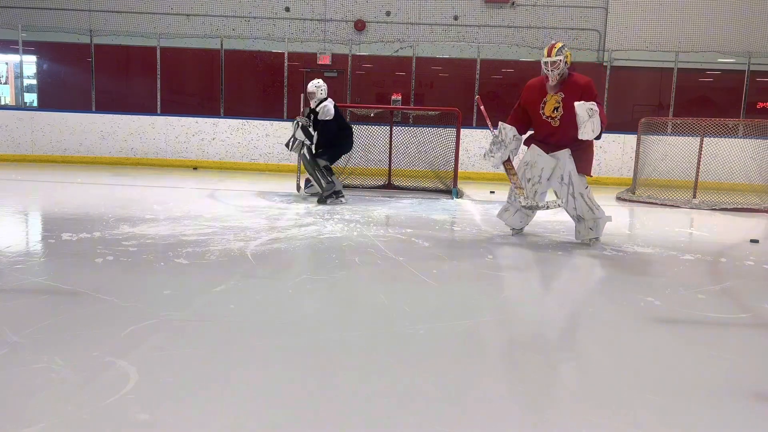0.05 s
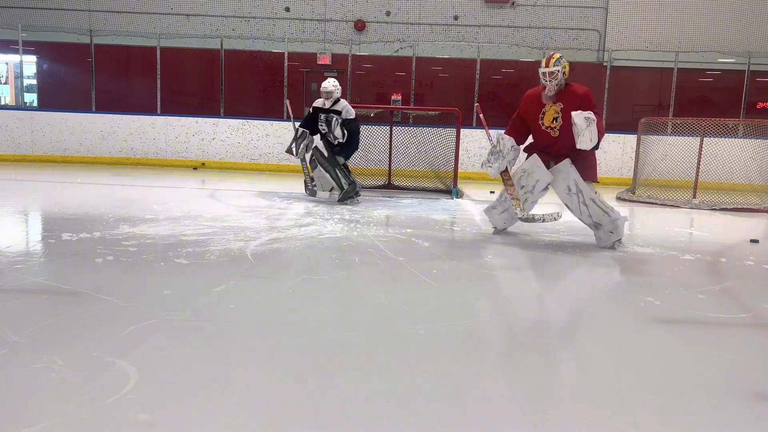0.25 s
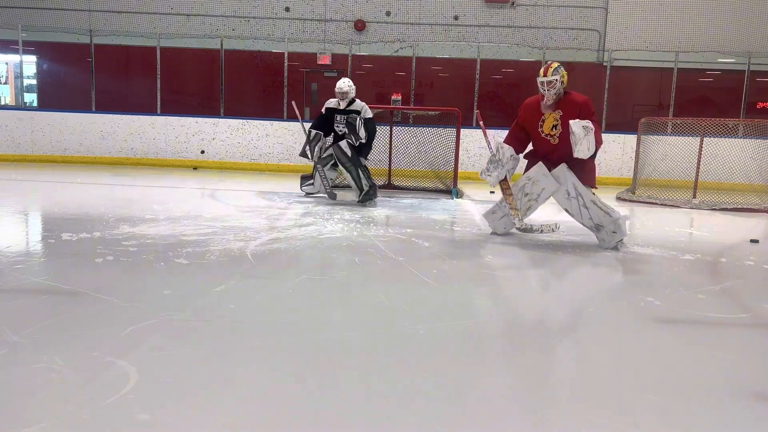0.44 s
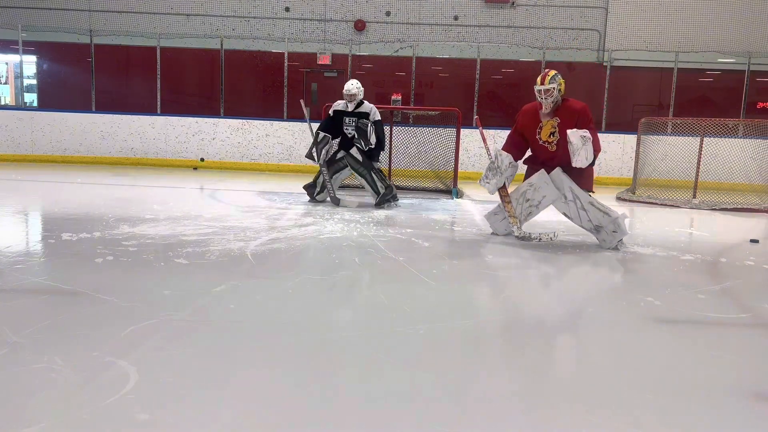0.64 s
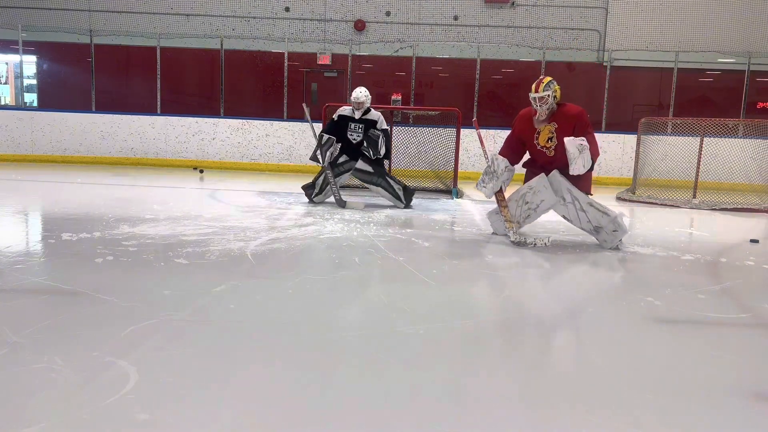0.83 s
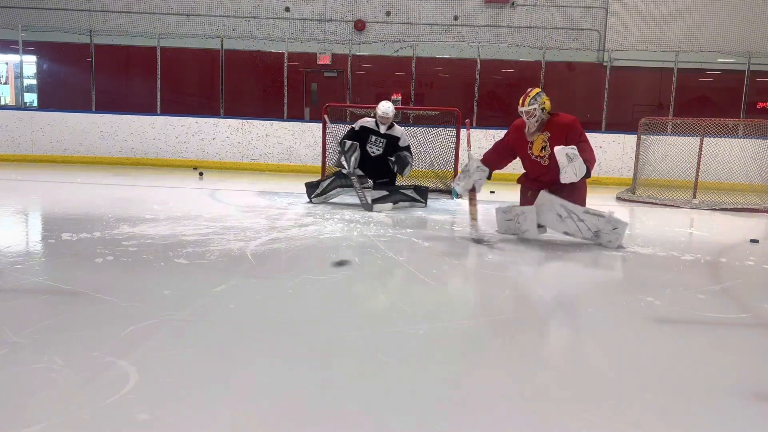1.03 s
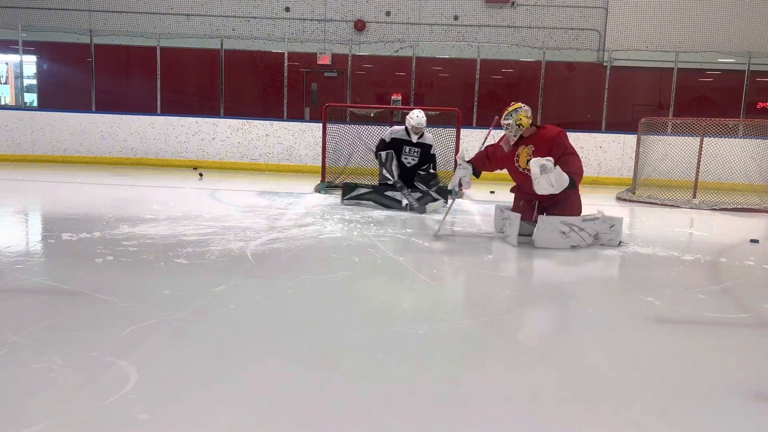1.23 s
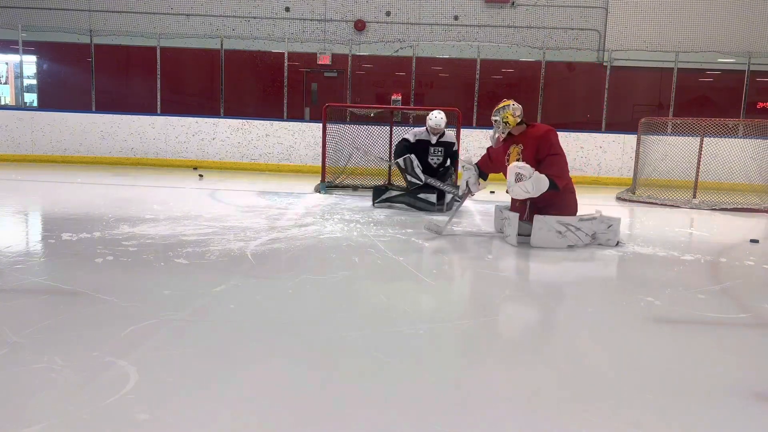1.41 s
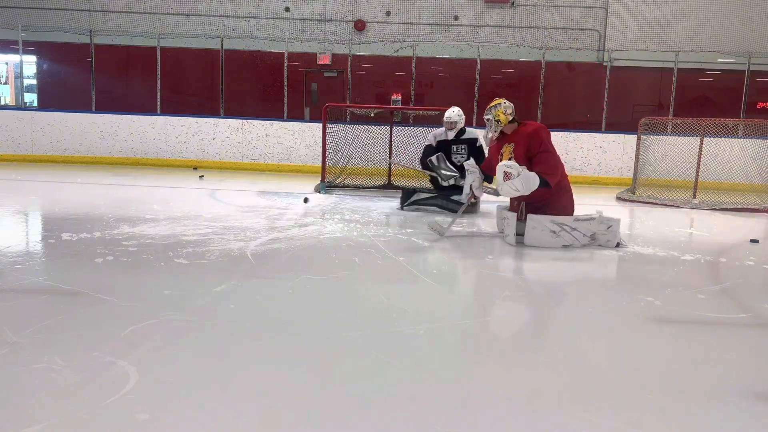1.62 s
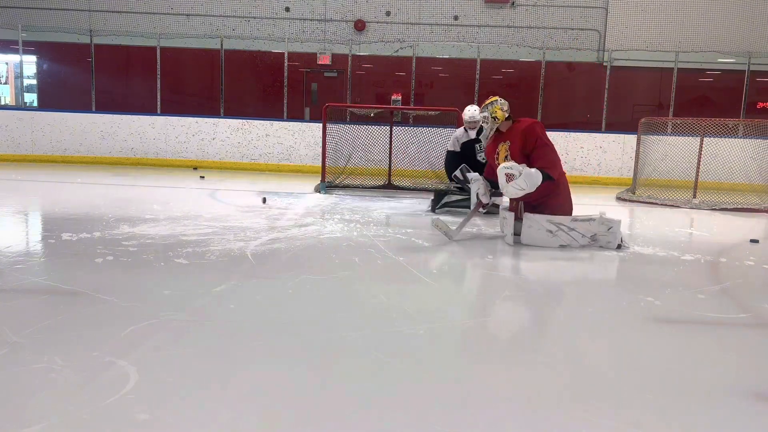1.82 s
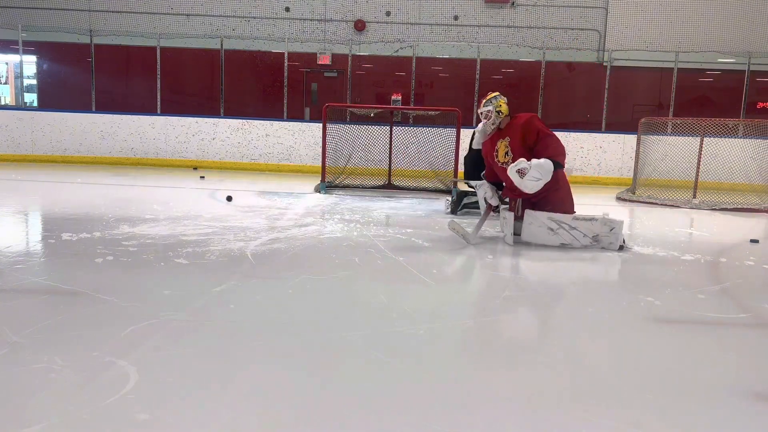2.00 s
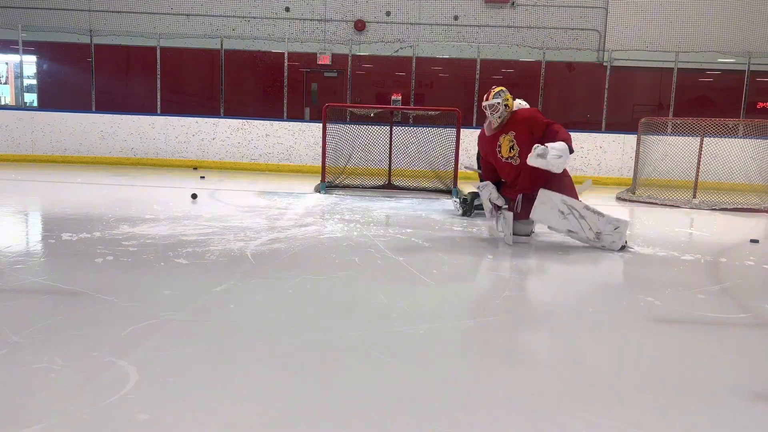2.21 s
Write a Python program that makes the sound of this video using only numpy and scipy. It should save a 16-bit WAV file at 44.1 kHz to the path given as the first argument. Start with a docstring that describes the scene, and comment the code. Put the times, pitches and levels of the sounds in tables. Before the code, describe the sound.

In a rumbling indoor ice rink, a stick taps the ice, then a puck is shot and cracks off a goalie's equipment. Pads drop with a boom and slide, skates scrape and spray snow, and each knock echoes.

```python
"""Goaltender practice in a large indoor ice rink. From the start the hall rumbles under a faint hiss, and steel
skates scrape, spray snow and sing. A stick slaps the ice (0.13 s), then a blade sweeps up a puck and shoots it
(0.7 s). The puck cracks against the goalie's gear (1.15 s) as leg pads drop, boom and slide, and the boards
ring hollow. Last, the loose puck ticks against the boards (2 s). Every knock hangs in a long echo, and a
limiter briefly turns the sound down after the loudest ones."""
import sys
import numpy as np
from scipy import signal
from scipy.fft import rfft, irfft, next_fast_len
from scipy.io import wavfile
from scipy.ndimage import uniform_filter1d, minimum_filter1d

SR = 44100
rng = np.random.default_rng(int(sys.argv[2]) if len(sys.argv) > 2 else 0)


def dump_mix(stems):
    """Bounce the given channels to the path in sys.argv[1] as a 16-bit WAV at rate SR."""
    frames = np.atleast_2d(stems).T  # one column per channel
    limited = np.clip(frames, -1, 1)  # hard clip at full scale
    pcm = np.round(limited * 32767).astype(np.int16)
    wavfile.write(sys.argv[1], SR, pcm)


N = 103635
TIME = np.arange(N) / SR


def from_db(db):
    """Turn decibels into a gain to multiply by."""
    return 10 ** (np.asarray(db) / 20)


def rms_one(x):
    """Scale a signal so its average strength (rms) is 1."""
    return x / np.sqrt(np.mean(x ** 2) + 1e-20)


def at_hz(points, hz):
    """Read a table at any pitch, blending between its rows."""
    pitches, values = np.transpose(points)
    return np.interp(np.log(hz + 1e-9), np.log(pitches), values)


def level(points):
    """Gain over time, from rows of time_s, level_db."""
    return from_db(np.interp(TIME, *np.transpose(points)))


def pan(db):
    """Left and right gains; above 0 dB the left is louder."""
    return from_db(np.array([[db], [-db]]) / 2)


def uneven(depth_db, per_s):
    """A gain that wanders at random."""
    steps = rng.standard_normal(400)
    return from_db(depth_db * np.interp(TIME * per_s, np.arange(len(steps)), steps))


def resonate(x, hz, width_hz):
    """Keep the sound near one pitch and weaken the rest."""
    return signal.lfilter(*signal.iirpeak(hz, hz / width_hz, fs=SR), x)


def bands(noise):
    """Split noise into 24 pitch bands, giving each one's centre_hz, width_hz and signal."""
    size = noise.shape[-1]
    spectrum, hz = rfft(noise), np.arange(size // 2 + 1) * SR / size
    edges_hz = np.geomspace(35, 17000, 25)
    for low, high in zip(edges_hz, edges_hz[1:]):
        yield np.sqrt(low * high), high - low, irfft(spectrum * ((hz >= low) & (hz < high)), size)


# how wide the sound is: pitch_hz, side_over_mid_db
STEREO_WIDTH = [(40, -20), (65, -25), (125, -14.5), (250, -9.5), (500, 0), (1000, 2), (3000, -1), (8000, 1),
                (10000, 9), (12500, -5)]

def spread(mid, side, hz):
    """Mix two unrelated signals into a wide left and right pair, alike in the bass."""
    width = from_db(at_hz(STEREO_WIDTH, hz))
    return np.array([mid + width * side, mid - width * side]) / np.sqrt(1 + width ** 2)


def wash(colour, grain_share=0, grains_per_s=790, grain_spread_db=6):
    """Wide, steady noise with a given tone colour; grains add the crackle of tiny breaks in the ice."""
    sizes = from_db(grain_spread_db * np.minimum(rng.exponential(1, (2, N)), 4))
    signs = rng.choice([-1, 1], (2, N))
    grains = rms_one(sizes * signs * (rng.random((2, N)) < grains_per_s / SR))
    size = 2 * next_fast_len(N // 2 + 1)
    hz = np.arange(size // 2 + 1) * SR / size
    mid, side = rfft(rng.standard_normal((2, N)) + grain_share * grains, size)
    return rms_one(irfft(spread(mid, side, hz) * from_db(at_hz(colour, hz)))[:, :N])


def blows(hits, colour, notes):
    """Each blow is a short crunch of noise plus the ringing notes of the thing that is struck."""
    t = TIME[:SR // 5]
    side_db, right_lag_s = -8, 0.00045  # knocks are narrow, and reach the right side later
    out = np.zeros((2, N + SR))
    for start_s, db, left_db, dull_hz, contact_s in hits:
        rise = 1 - np.exp(-t / (0.19 * contact_s))
        crunch, power, ring = 0, 0, 0
        for hz, width, (mid, side) in bands(rng.standard_normal((2, len(t)))):
            fade = np.exp(-t / (contact_s + 1 / hz))  # low pitches last longer
            burst = spread(mid, from_db(side_db) * side, hz) * rise ** 2 * fade
            gain = from_db(at_hz(colour, hz)) * np.sqrt(width / (1 + (hz / dull_hz) ** 4))
            crunch += gain * burst / np.linalg.norm(burst, axis=1, keepdims=True)
            power += gain ** 2
        crunch *= np.sqrt(contact_s * SR / power) / 2
        for hz, note_db, ring_s in notes:
            fade = from_db(note_db - 60 * t / ring_s)  # ring_s is the time to fade by 60 dB
            ring += fade * np.sin(2 * np.pi * hz * t) / np.hypot(1, (hz / dull_hz) ** 2)
        hit = from_db(db) * pan(left_db) * (crunch + ring * rise)
        for channel, lag_s in enumerate((0, right_lag_s)):
            start = int((start_s + lag_s) * SR)
            out[channel, start:start + len(t)] += hit[channel]
    return out[:, :N]


# low rumble and high hiss, with a narrow treble gap cut near 10.5 kHz: pitch_hz, level_db
RUMBLE_AND_HISS_COLOUR = [(20, -33), (40, -13), (65, -4), (100, -7), (200, -6), (400, 0.5), (800, -12),
                          (1250, 7), (1800, 2), (2600, -23), (4000, -35), (8000, -28), (10500, -48),
                          (12200, -22.5), (14200, -36), (15500, -59)]

def rumble_and_hiss():
    """The rink's steady rumble, plus a faint recorder hiss at 12-15 kHz."""
    return from_db(-39.5) * wash(RUMBLE_AND_HISS_COLOUR)


# how long the echo takes to fade by 60 dB: pitch_hz, fade_s
ECHO_FADE = [(70, 5.1), (300, 0.82), (1200, 4.95), (3000, 0.67), (6000, 0.64), (14000, 0.53)]
# how strong the echo is: pitch_hz, level_db
ECHO_COLOUR = [(70, -19), (300, -6.5), (800, -7), (1250, -5.5), (1700, -11), (3000, -21), (5000, -17),
               (8500, -21), (10500, -32), (13000, -36), (16000, -34)]
# hollow notes of the boards round the rink: pitch_hz, width_hz, boost_db
BOARD_NOTES = [(863, 32, 5), (1088, 64, 4), (1240, 160, 2)]

def hall_echo(knocks):
    """Echoes come back late and in clumps, pick up the boards' hollow ring and fade band by band."""
    delay_s, build_s, early_db, early_s = 0.036, 0.0053, 13, 0.025
    t = np.maximum(TIME - delay_s, 0)
    first_echoes = 1 + from_db(early_db) * np.exp(-t / early_s)
    swell = (1 - np.exp(-t / build_s)) * first_echoes * uneven(depth_db=4, per_s=41)
    echo = 0
    for hz, _, (mid, side) in bands(rng.standard_normal((2, N + 365))):
        shape = swell * from_db(-60 * t / at_hz(ECHO_FADE, hz))
        gain = from_db(at_hz(ECHO_COLOUR, hz)) / np.linalg.norm(shape)
        echo += gain * shape * spread(mid[:N], side[:N], hz)
    echo += sum((from_db(db) - 1) * resonate(echo, hz, width) for hz, width, db in BOARD_NOTES)
    return signal.fftconvolve(knocks[:1], echo, axes=1)[:, :N]  # the left channel feeds both sides


# loudness of steel scraping ice, and of sprayed snow: time_s, level_db
SCRAPE_LOUDNESS = [(0, -41), (.25, -40), (.37, -30.5), (.62, -34), (.82, -36.5), (.92, -29.5), (1.0, -29.5),
                   (1.07, -25), (1.2, -29.5), (1.34, -25), (1.45, -26.5), (1.51, -22.5), (1.555, -30),
                   (1.59, -26.5), (1.8, -30.5), (2.05, -34), (2.35, -40)]
SNOW_LOUDNESS = [(0, -39), (.15, -42.5), (.21, -32), (.35, -39.5), (.62, -40), (.79, -34), (.95, -35),
                 (1.1, -33), (1.22, -24.5), (1.36, -32.5), (1.47, -38), (1.51, -34), (1.57, -36.5),
                 (1.75, -47.5), (2.35, -73)]
# tone colour of the scrape: pitch_hz, level_db
SCRAPE_COLOUR = [(150, -66), (400, -11), (800, -3), (1100, -3), (1350, -1), (1700, -4), (2200, -7.5),
                 (3000, -16.5), (5000, -28.5), (9000, -35.5), (15000, -96)]
# hiss of snow, with a narrow treble gap cut near 10.5 kHz: pitch_hz, level_db
SNOW_WITH_GAP = [(1000, -7.5), (2400, 11.5), (3500, 4), (5000, 3), (7000, -7), (9000, -8), (10500, -46),
                 (12300, -23.5), (14200, -28), (15500, -55)]
# four skate tones, then the boards' ring: start_s, length_s, pitch_hz, width_hz, relative_level_db
RINGING_TONES = [(0.17, 0.42, 1680, 90, -4), (0.23, 0.42, 1420, 65, -6), (0.21, 0.48, 4990, 130, -17),
                 (0.81, 0.36, 1380, 75, 0), (1.28, 0.28, 1270, 140, -1)]

def skates_and_boards():
    """Skates bite unevenly, throw up snow and sing; after the save the boards ring hollow."""
    scrape = level(SCRAPE_LOUDNESS) * wash(SCRAPE_COLOUR, grain_share=0.37)
    snow = level(SNOW_LOUDNESS) * wash(SNOW_WITH_GAP, grain_share=0.37)
    ringing = 0
    for start_s, length_s, hz, width, db in RINGING_TONES:
        progress = np.clip((TIME - start_s) / length_s, 0, 1)
        swell = 2 * np.sqrt(progress * (1 - progress))
        tone = rms_one(resonate(resonate(rng.standard_normal((2, N)), hz, width), hz, width))
        ringing += from_db(db - 33) * swell * tone
    return uneven(depth_db=1.56, per_s=40) * (scrape + snow + ringing)


# loudness of the leg pads as they flex, drop and slide: time_s, level_db
SLIDE_LOUDNESS = [(0, -30.5), (.1, -36), (.22, -42.5), (.3, -31.5), (.36, -48), (.46, -40.5), (.7, -35.5),
                  (.85, -77), (1.02, -39), (1.13, -27.5), (1.21, -23.5), (1.4, -33), (1.6, -36.5),
                  (1.85, -39), (2.28, -51), (2.35, -41)]
# tone colours of the slide and the boom: pitch_hz, level_db
SLIDE_COLOUR = [(40, -64), (90, -2.5), (135, 4), (185, 3.5), (240, 0.5), (300, -2), (450, 4.5), (800, 5.5),
                (1500, 5.5), (4000, -37.5)]
BOOM_COLOUR = [(22, -35), (45, -16), (65, 10.5), (85, 0), (130, -0.5), (300, -31)]
# pad landings that set off a boom: start_s, level_db, fade_db_per_s
LANDINGS = [(1.148, -29, 213), (1.222, -32, 110), (1.52, -45.5, 19)]

def leg_pads():
    """Leg pads rub along the ice, and their landings boom through the hall."""
    boom, rise_s = 0, 0.012
    for start_s, db, fade_db_per_s in LANDINGS:
        age = np.maximum(TIME - start_s, 0)
        boom += from_db(db - fade_db_per_s * age) * np.minimum(age / rise_s, 1)
    return level(SLIDE_LOUDNESS) * wash(SLIDE_COLOUR) + boom * wash(BOOM_COLOUR)


# soft blows: start_s, level_db, left_over_right_db, dull_above_hz, contact_s
THUD_HITS = [(0.1936, -11.5, 5, 1990, 0.00097), (0.2890, -13, -2, 536, 0.0024),
             (0.345, -27.5, -0.5, 296, 0.023), (0.772, -17, 1, 5000, 0.0024),
             (0.9755, -13, -2.5, 15000, 0.0028), (1.1562, -0.5, 1, 525, 0.0032),
             (1.191, -11, 0, 2500, 0.0045), (1.2160, -6.5, 4.5, 1790, 0.0046), (1.232, -36, 0, 1240, 0.013),
             (1.305, -16, 9, 500, 0.0033), (1.573, -16.5, 2.5, 1420, 0.011), (1.694, -15, -5, 1200, 0.0065)]
# tone colour of a thud: pitch_hz, level_db
THUD_COLOUR = [(50, -40), (120, -14), (250, -9.5), (450, -3), (720, -2.5), (1000, -0.5), (1400, 2.5),
               (2200, -18), (4000, -10.5), (9000, -33), (15000, -31)]
# notes the pads ring with: pitch_hz, level_db, ring_s
PAD_NOTES = [(289, -44, 0.17), (704, -37, 0.024), (850, -3, 0.052)]

def thuds():
    """Pads, boots and puck bump with dull thuds."""
    return blows(THUD_HITS, THUD_COLOUR, PAD_NOTES)


# the puck striking the boards: start_s, level_db, left_over_right_db, dull_above_hz, contact_s
PUCK_HITS = [(2.0060, -14, 5, 4500, 0.0007)]
# tone colour of its tick: pitch_hz, level_db
PUCK_COLOUR = [(300, -20), (1000, -6), (1500, 4), (2500, -8), (3300, -2), (4200, -13.5), (6000, -18),
               (12000, -35)]
# notes the puck rings with: pitch_hz, level_db, ring_s
PUCK_NOTES = [(1490, 1, 0.011), (2476, -17, 0.02)]

def puck_tick():
    """The loose puck strikes the boards with one short tick."""
    return blows(PUCK_HITS, PUCK_COLOUR, PUCK_NOTES)


# stick on ice: start_s, level_db, left_over_right_db, dull_above_hz, contact_s
STICK_HITS = [(0.1296, -4, 5, 16000, 0.0011), (0.1345, -12.5, 5, 5000, 0.00077),
              (0.1865, -31, -4, 4000, 0.0022), (0.1931, -13, 5, 7000, 0.001),
              (0.2897, -22.5, -1, 3000, 0.0012), (1.0705, -27, -8, 2500, 0.0029)]
# tone colour of a slap: pitch_hz, level_db
STICK_COLOUR = [(100, -24), (450, -14), (750, -8.5), (950, -38), (1250, -8), (1650, 17.5), (2100, -1),
                (2800, -9.5), (5000, -10), (7000, -11), (10000, -15), (15000, -40)]
# notes the stick rings with: pitch_hz, level_db, ring_s
STICK_NOTES = [(1436, -12, 0.032), (1652, -5, 0.037), (2063, -13, 0.018), (3340, -14, 0.023),
               (4400, -21, 0.027), (5000, -18, 0.03)]

def stick_slaps():
    """A stick slaps the ice and rings briefly."""
    return blows(STICK_HITS, STICK_COLOUR, STICK_NOTES)


# blade on puck: start_s, level_db, left_over_right_db, dull_above_hz, contact_s
SHOT_HITS = [(0.6615, -11, 3.5, 2300, 0.0033), (0.6672, -19, 0, 2600, 0.0018),
             (0.6906, -10.5, 8.5, 16000, 0.0016), (0.7002, 1, 2, 2160, 0.0014),
             (0.7018, 2.5, 6.5, 8600, 0.0011), (0.7213, -5.5, 14, 4400, 0.0011),
             (0.7560, -33, 7, 6000, 0.0012), (0.7688, -31, -6, 5000, 0.00087),
             (0.7726, -14.5, -5, 6700, 0.0016), (0.7790, -21.5, 10, 6000, 0.0017)]
# tone colour of the shot: pitch_hz, level_db
SHOT_COLOUR = [(100, -20), (300, -37), (620, -5.5), (900, -7), (1350, -4.5), (1800, 3), (2600, 0.5),
               (3400, -2), (4800, -10.5), (6600, -7.5), (8800, -9), (11500, -27), (15000, -28)]
# notes the blade rings with: pitch_hz, level_db, ring_s
BLADE_NOTES = [(1380, -13, 0.03), (1761, -12, 0.02), (2050, -12, 0.018), (2540, -3, 0.01),
               (7000, -14, 0.007)]

def shot():
    """The stick's blade sweeps up the puck and shoots it in a quick run of knocks."""
    return blows(SHOT_HITS, SHOT_COLOUR, BLADE_NOTES)


# puck on the goalie's gear: start_s, level_db, left_over_right_db, dull_above_hz, contact_s
SAVE_HITS = [(1.1510, -2, 1.5, 16000, 0.004), (1.1538, 0, -1, 16000, 0.0017),
             (1.1618, -3.5, -6.5, 6960, 0.0014), (1.1652, -4.5, -7, 10100, 0.00088),
             (1.1857, -10, 5, 8040, 0.0037), (1.1925, -19, 2, 6000, 0.003), (1.2205, -6.5, 2, 5070, 0.0011),
             (1.2772, -15, 11, 4000, 0.00044), (1.3665, -19, 3, 3000, 0.00048)]
# tone colour of the crack: pitch_hz, level_db
SAVE_COLOUR = [(100, -11), (500, -2), (1300, 6), (1600, -5), (1900, 3.5), (2800, -4), (4200, -7),
               (6500, -9), (10500, -23), (14000, -10), (16000, -30)]
# notes the gear rings with: pitch_hz, level_db, ring_s
GEAR_NOTES = [(847, -13.5, 0.086), (1165, -16, .04), (1865, -10, 0.034), (4070, -13, 0.015),
              (6640, -22, 0.031)]

def save():
    """The puck cracks against the goalie's gear and sets it ringing."""
    return blows(SAVE_HITS, SAVE_COLOUR, GEAR_NOTES)


def scene():
    """Knocks and their echo, over skates, boards, pads, rumble and hiss."""
    knocks = stick_slaps() + shot() + save() + thuds() + puck_tick()
    rink = hall_echo(knocks) + skates_and_boards()
    return knocks + pan(3) * rink + pan(-0.5) * (leg_pads() + rumble_and_hiss())


def record(dry):
    """A limiter turns peaks down and recovers steadily; then peaks are rounded and the top treble cut."""
    limit_db, recover_db_per_s, smooth_s = -2.6, 182, 0.00061
    ceiling, cutoff_hz = 0.92, 16400
    over_db = np.maximum(20 * np.log10(abs(dry).max(0) + 1e-9) - limit_db, 0)
    recovery_db = recover_db_per_s * TIME
    dip_db = np.maximum.accumulate(over_db + recovery_db) - recovery_db
    window = int(smooth_s * SR) + 1  # smoothing starts each dip just before its peak
    limited = dry * from_db(uniform_filter1d(minimum_filter1d(-dip_db, window), window))
    rounded = limited / (1 + (limited / ceiling) ** 6) ** (1 / 6)
    return signal.sosfilt(signal.cheby2(14, 70, cutoff_hz, fs=SR, output="sos"), rounded)


dry = scene()
out = record(dry)
dump_mix(out)
```